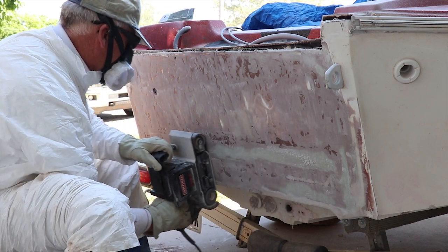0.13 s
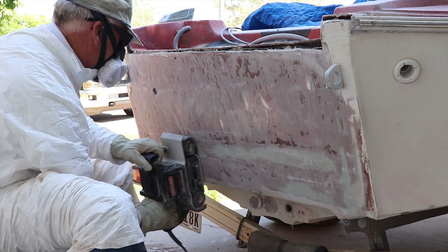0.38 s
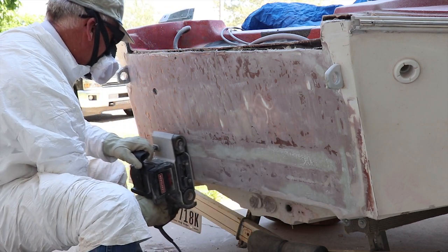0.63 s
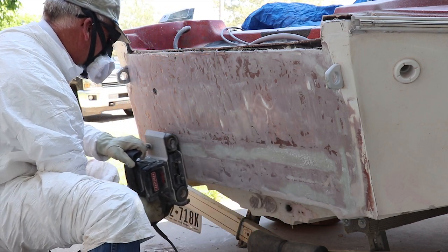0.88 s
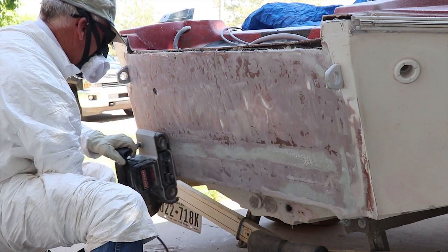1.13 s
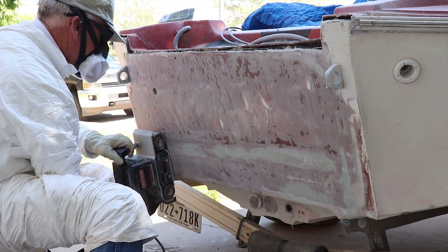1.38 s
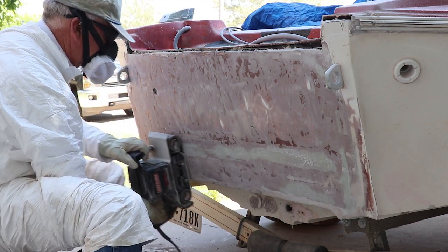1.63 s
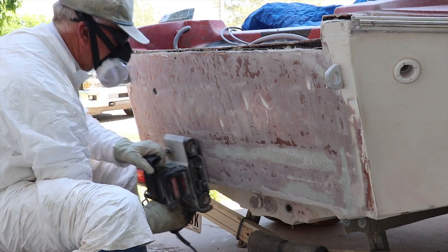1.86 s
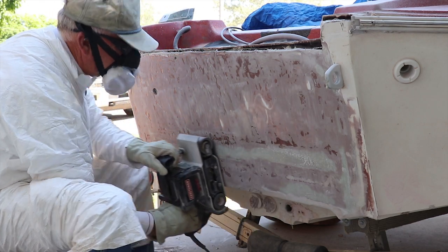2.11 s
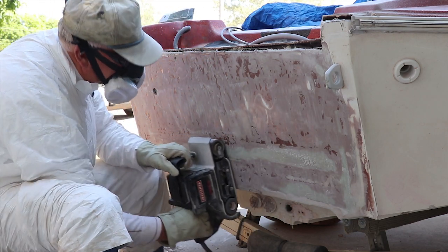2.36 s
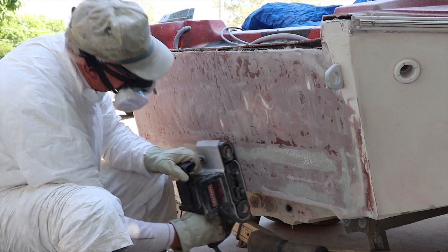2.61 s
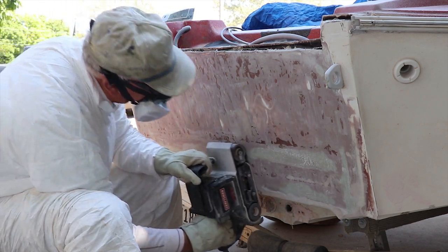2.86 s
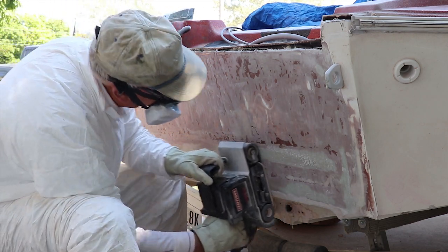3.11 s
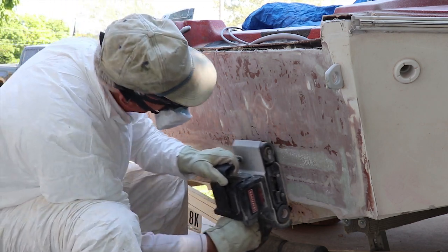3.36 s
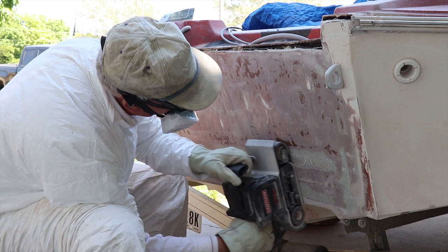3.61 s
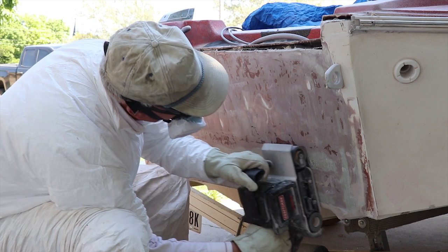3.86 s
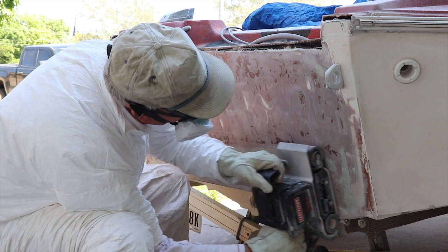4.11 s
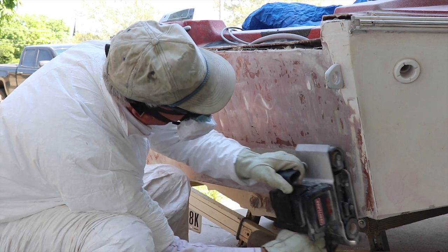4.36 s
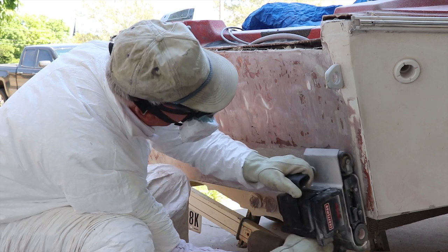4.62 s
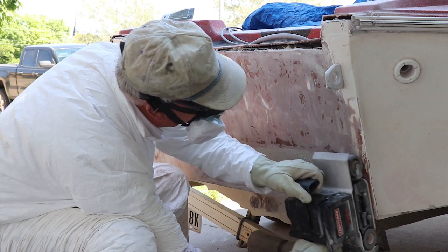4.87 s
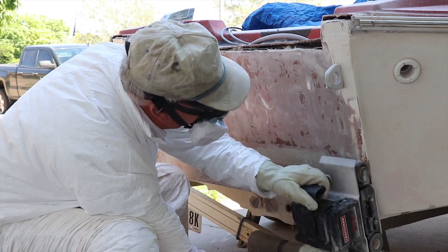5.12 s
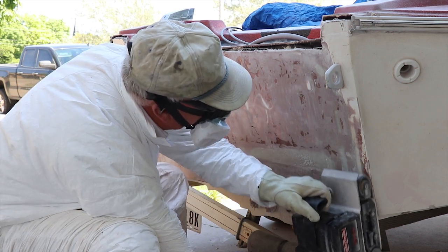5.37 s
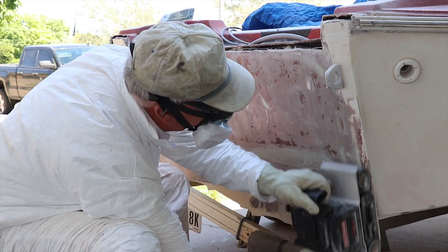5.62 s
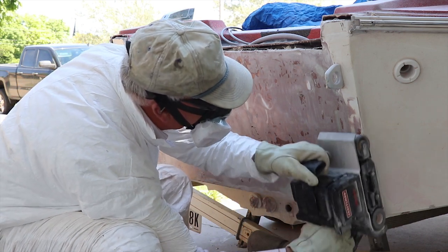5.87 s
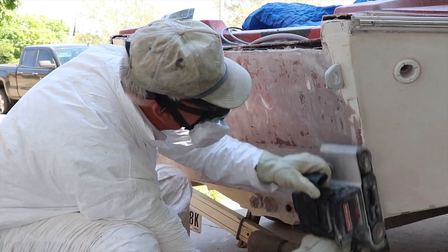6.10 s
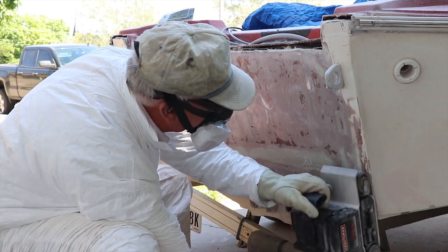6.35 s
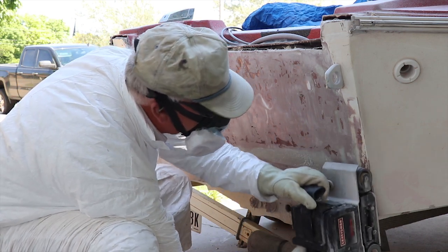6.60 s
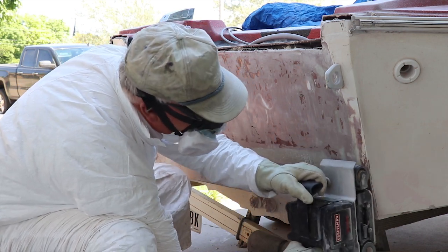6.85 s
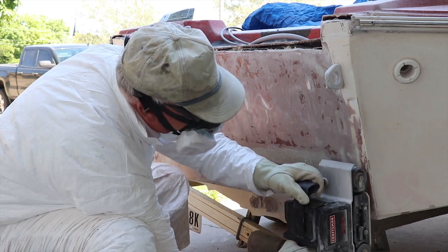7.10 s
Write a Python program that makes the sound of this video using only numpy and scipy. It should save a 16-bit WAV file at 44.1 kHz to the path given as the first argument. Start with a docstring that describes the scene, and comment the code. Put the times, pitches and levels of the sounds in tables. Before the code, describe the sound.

A handheld belt sander whines high and steady while its abrasive rasps on a hollow hull, briefly let go, pulled again, then running down.

```python
"""Outdoors under a roof, a handheld belt sander grinds a fibreglass hull a step from two microphones.
Sines locked to the shaft angle give the whine of drive belt, fan, commutator and weaker orders.
Shaped noise gives hull drone, air rush and abrasive rasp, over soft hull thuds and a low yard rumble.
The trigger is let go briefly, pulled again, then released so that the motor runs down."""
import sys
import numpy as np
from scipy import signal
from scipy.fft import rfft, irfft
from scipy.io import wavfile
from scipy.ndimage import uniform_filter1d

SR = 44100
rng = np.random.default_rng(int(sys.argv[2]) if len(sys.argv) > 2 else 0)


def generate_wav(signal):
    """Clip the signal to [-1, 1] and save it as 16-bit WAV at the path in sys.argv[1]."""
    frames = np.transpose(np.atleast_2d(signal))
    scaled = np.clip(frames, -1, 1) * 32767
    pcm = np.round(scaled).astype(np.int16)
    wavfile.write(sys.argv[1], SR, pcm)


def voltage_ratio(decibels):
    """Convert decibels (scalar or array-like) to amplitude ratios, 20 dB per decade."""
    exponent = np.asarray(decibels, float) / 20
    return 10 ** exponent


N = 318843

# Yard rumble, relative spectrum: f/Hz, level/dB
YARD_SPECTRUM = [(12, -40), (25, -24), (40, -14), (60, -10), (80, -7.5), (100, -5), (135, -9), (200, -7.5),
                 (255, -12.5), (280, -2), (300, 0.5), (390, -27)]
# Knocks of the tool on the hull: t/s, level/dB (the envelope peaks 2.6 dB higher), f/Hz
HULL_KNOCKS = [(0.479, -42, 103), (1.46, -32, 522), (2.292, -43, 96.9), (2.832, -39, 159),
               (4.005, -31, 867)]
# Relative noise spectra of hull drone, air rush and abrasive rasp: f/Hz, level/dB per Hz
DRONE_SPECTRUM = [(150, -54), (250, -26), (295, -23.5), (329, -11.5), (366, -6.5), (471, -9), (737, -2.5),
                  (815, -4.5), (949, -4.5), (1050, -10.5), (1400, -6), (1820, -14.5), (3080, -120)]
RUSH_SPECTRUM = [(590, -32), (1000, -33), (1040, -14), (1250, -7.5), (1470, -8), (1550, -9.5),
                 (1590, -10.5), (1720, -12), (1900, -8), (2680, -9.5), (3020, -5.5), (3560, -10),
                 (4410, -12), (4870, -33), (5500, -16.5), (7150, -24), (12100, -120)]
RASP_SPECTRUM = [(2650, -20), (4500, -10.5), (5100, -11.5), (6000, -6), (7100, -3.5), (7900, -4.5),
                 (9000, -5.5), (10200, -8), (12000, -13), (15200, -18.5), (16000, -21)]
# Drone, rush, rasp in turn: level/dB, share of the push, change once turned away/dB,
# speed slope/dB per octave, left minus right/dB, change of that/dB per sample of lag
NOISE_LAYERS = [(-28.5, 0.89, -1.5, 2.5, 0.4, 0.17), (-26., 1.1, 0.05, 1.5, 0, 0.043),
                (-22.5, .8, -1.24, 6., 2.5, -1.5)]
# Slope of the noise about 7.5 kHz in stages 0-3: slope/dB per octave
TREBLE_SLOPE = [-1, -0.055, -1.4, -1.9]
# Hand on the tool: t/s, push/dB (before each layer's share), grit brightness above 9 kHz/dB per octave
HAND_PUSH = [(0, 1, -2), (.5, 0.1, 5), (1.1, -.5, 2), (1.5, 0, -.5), (1.9, -0.5, -2), (2.45, 0, 3),
             (3.14, -0.5, 8), (3.22, -0.5, 0), (3.56, 1, -1.), (4.55, 0.2, 1.5), (5.1, 0.5, 1),
             (5.22, -0.5, -1), (5.9, 0., 2), (6.7, 1.5, -3), (6.82, -0.5, 1), (7.23, -1.5, 5)]
# Coherence of the noise: f/Hz, share of the power that both microphones get alike
COHERENCE = [(100, 0.61), (400, 0.93), (800, 0.63), (1500, 0.26), (3500, 0.69), (5000, 0.72), (7000, 0.53),
             (15000, 0.48)]
# Stereo balance before any scaling: f/Hz, left minus right/dB
BALANCE = [(60, 3), (110, 2), (200, -13), (380, 1.5), (700, -1), (1290, 1.5), (2380, -4), (4400, -1.0),
           (8120, -2.5), (15000, -4.5)]
# Path difference as the tool works toward the right: t/s, lag of the left microphone/samples
LEFT_LAG = [(0, 0), (2.5, 0.3), (3.3, 1), (4.2, 2), (7.23, 3)]
# Stage of the work: t/s, stage (0 facing the microphones, 1 turned away, 2 new pull, 3 running down)
WORK_STAGE = [(0, 0), (2.9, 0), (3.5, 1), (5.45, 1), (5.75, 2), (6.4, 2), (6.55, 3), (7.23, 3)]
# Housing resonances before any scaling: f/Hz, width/Hz, level/dB
HOUSING_MODES = [(480, 50, -8), (570, 70, 6), (690, 70, -10), (840, 60, 9), (960, 60, -5), (1150, 90, 7),
                 (1900, 150, 4), (2370, 110, 11), (2780, 120, 6), (5750, 300, 4), (6600, 400, 6),
                 (8550, 350, 6)]
# Shaft speed while the belt bites, slower under a firmer push: t/s, speed/turns per s
LOADED_SPEED = [(0.0, 364.5), (0.14, 360.8), (0.3, 364.6), (0.52, 371.8), (0.92, 377.4), (1.08, 374.4),
                (1.35, 377.0), (1.76, 380.6), (1.98, 373.2), (2.22, 370.8), (2.66, 377.2), (3.18, 375.6),
                (3.45, 367.4), (3.76, 363.4), (3.92, 366.0), (4.24, 360.3), (4.5, 364.2), (4.72, 373.0),
                (4.97, 376.6), (5.12, 371.0), (5.3, 365.0), (5.45, 367.5)]
# Brief dips of the mesh tone: t/s, length/s
MESH_DIPS = [(0.253, 0.021), (3.538, 0.0047), (3.643, .008), (4.01, 0.01), (4.207, 0.0064)]
# Beaming of the mesh tone by the belt cover as the tool turns:
# t/s, left minus right/dB, level toward the microphones/dB
COVER_BEAM = [(0, 2, 0), (.85, 1.5, 2), (1.05, 2, -1), (1.38, 11, -1), (1.7, 1, 3), (2.0, 0, -3),
              (2.7, 5, -1.5), (3.15, -5, -1), (3.6, -6, 1.5), (4.35, -16, -0.5), (4.9, -2, 1),
              (5.4, -3, 0.5), (5.8, -3, -1), (6.15, -5, 2), (6.33, -14, -3), (6.55, -3, 6.5), (7.23, 2, 3)]
# Swells of the mesh octave, before housing and trim: t/s, half length/s, level/dB
MESH_OCTAVE_SWELLS = [(.1, .15, -33), (2.05, 0.17, -30.5), (2.75, 0.29, -30.5), (3.25, 0.22, -32.5),
                      (3.6, .12, -29.5), (4.15, 0.15, -30.5), (5.05, 0.23, -30), (5.9, 0.14, -27),
                      (6.69, 0.061, -32.5)]
# Commutator whistle where its echoes add up, before the speed slope:
# t/s, half length/s, level/dB, left minus right/dB, lead of the left/rad
COMMUTATOR_SWELLS = [(.1, .12, -32, -4, -1.5), (.48, 0.15, -23.5, 7, -2.5), (.88, 0.12, -25.5, 16, -6),
                     (1.18, .08, -43, 11, 2.5), (1.36, 0.15, -24, -10, -1), (1.72, 0.17, -23, 8, -3),
                     (2.1, .12, -28.5, -14, -0.5), (2.4, 0.14, -25, 6, -5), (2.8, .15, -35, 2, -5),
                     (3.12, .15, -24, -7, -5), (3.6, .15, -38, -1, -8), (3.92, .1, -29, 2, -8.7),
                     (4.2, .1, -28, 4, -10), (4.65, 0.1, -26, 3, -8), (4.82, .08, -40, -20, -12),
                     (5.12, 0.075, -25, -4, -7.5), (5.38, .08, -30, -4, -5.5), (5.85, 0.11, -23.5, -4, 2),
                     (6.1, .1, -41, -4, 1.5), (6.7, .2, -31, 1, 1.5)]
# Fan tone in stages 0-3, before load and coasting: level/dB
FAN_STAGE_DB = [-32, -32.5, -31.5, -40]
# Hum of the belt pulley through the hull: t/s, level/dB
PULLEY_HUM = [(0, -77), (3.6, -73), (3.94, -58), (4.2, -64), (4.39, -55), (5.1, -58), (5.5, -68),
              (5.7, -78), (7.23, -79)]
# Weaker tones, before housing: multiple of the shaft rate, then level/dB in stages 0-3; thirds are the
# belt pulley, many close to 4 are mesh sidebands from pulley and belt laps, others perhaps bearings
WEAK_ORDERS = [(0.992, -41, -44, -47, -46), (1.966, -39.5, -40, -48, -50),
               (2.575, -35.5, -40.5, -42.5, -41), (3.025, -84, -52, -51, -53), (3.55, -45, -43, -36.5, -46),
               (3.69, -77, -39.5, -45, -67), (3.916, -56, -39.5, -34.5, -51), (4.06, -49, -49, -38, -41.5),
               (4.383, -48.5, -42, -36, -56), (4.954, -45, -82, -43, -54), (5.13, -45.5, -63, -60, -41.5),
               (5.925, -44.5, -64, -57, -56), (6.34, -57, -53, -62, -62), (7.13, -58, -52, -48, -51),
               (7.91, -63, -60, -44.5, -53), (9.04, -43.5, -44, -45, -46), (10.1, -47, -53, -43, -52),
               (11.03, -45.5, -45, -57, -60), (12.05, -44, -52, -47, -41), (13.84, -46, -64, -59, -69),
               (16.53, -67, -52, -44.5, -43), (38, -58, -61, -72, -65)]

MESH, BLADES, BARS = 4, 19, 25  # events per shaft turn
PULLEY_TURNS, SEAM_LAPS = 1 / 3, 0.098  # per shaft turn
RELEASE_S, PULL_S, STOP_S = 5.47, 5.73, 6.425  # trigger let go, pulled again, let go for good
FREE_TURNS, LOAD_SPAN = 385, 18.3  # speed without load, drop at full load (turns per s)
WIN = 1024  # noise frame (samples)


def over_time(table):
    """Linear interpolation: the columns of a table at every sample."""
    s, *columns = np.transpose(table)
    return [np.interp(np.arange(N) / SR, s, c) for c in columns]


def over_hz(table, hz, outside=None):
    """Logarithmic frequency axis: a spectrum table read at hz."""
    f, v = np.transpose(table)
    return np.interp(np.log(np.maximum(hz, 1)), np.log(np.maximum(f, 1)), v, outside, outside)


def by_stage(values, stage):
    """Linear interpolation between the values for stages 0-3."""
    return np.interp(stage, np.arange(4), values)


def walk(rate, count=1):
    """Random modulation: levels held about 1 / rate s and slewed twice; spread near 1."""
    k = int(SR / rate / 64) + 1  # in steps of 64 samples
    held = np.repeat(rng.standard_normal((count, N // (64 * k) + 2)), k, axis=1)
    coarse = 1.146 * uniform_filter1d(uniform_filter1d(held, k), k)
    return np.array([np.interp(np.arange(N) / 64, np.arange(len(c)), c) for c in coarse])


def sides(pan_db):
    """Constant-power panning: left and right gains."""
    gain = voltage_ratio(np.array([pan_db, -pan_db]) / 2)
    return gain * np.sqrt(2 / np.sum(gain ** 2, axis=0))


def housing_db(hz):
    """Resonance: lift or dip of the housing at a frequency, as a sum of bell curves."""
    return sum(db / (1 + (2 * (hz - f) / width) ** 2) for f, width, db in HOUSING_MODES)


def swells(table, steady_db):
    """Power addition: a steady level plus bell-shaped swells."""
    t = np.arange(N) / SR
    power = voltage_ratio(steady_db) ** 2
    for s, half, db, *_ in table:
        power = power + voltage_ratio(db) ** 2 * np.exp(-((t - s) / half) ** 2)
    return 10 * np.log10(power)


def yard():
    """Diffuse background: low rumble of the surroundings and the trailer, nearly alike in both channels."""
    hz = np.fft.rfftfreq(N, 1 / SR)
    spectrum = rfft(rng.standard_normal((2, N))) * voltage_ratio(over_hz(YARD_SPECTRUM, hz, -99))
    mid, side = irfft(spectrum, N)
    both = mid + 0.19 * side * np.array([[1], [-1]])
    both = both * voltage_ratio(0.5 * walk(3.08)) * sides(1.6)[:, None]
    return voltage_ratio(-51.5) * both / mid.std()


def knocks():
    """Impact excitation: short soft thuds of the hull, each a sine that rises and decays."""
    out, t = np.zeros(N + SR), np.arange(SR // 4) / SR
    envelope = (t / 0.0089) * np.exp(1 - t / 0.012)
    for s, db, hz in HULL_KNOCKS:
        out[int(s * SR):][:len(t)] += voltage_ratio(db) * np.sin(2 * np.pi * hz * t) * envelope
    return out[:N]


def noise_power(hz, at, speed, lag):
    """Incoherent addition: drone, rush and rasp powers per channel, frequency and frame."""
    push_db, bright = (c[at] for c in over_time(HAND_PUSH))
    stage = over_time(WORK_STAGE)[0][at]
    away, octaves = np.minimum(stage, 1), np.log2(speed[at] / FREE_TURNS)
    power = 0
    for table, layer in zip((DRONE_SPECTRUM, RUSH_SPECTRUM, RASP_SPECTRUM), NOISE_LAYERS):
        db, share, away_db, speed_db, pan_db, lag_db = layer
        db = db + share * push_db + away_db * away + speed_db * octaves
        pan_db = pan_db + lag_db * lag[at]
        shape = voltage_ratio(over_hz(table, hz, -99) + 0.26 * housing_db(hz)) ** 2
        power = power + (shape / shape.mean())[:, None] * (voltage_ratio(db) * sides(pan_db))[:, None] ** 2
    # treble slope by stage, above 4.5 kHz and level below 5.5 kHz
    slope_octaves = np.log2(np.maximum(hz, 5500) / 7500)[:, None] * (hz > 4500)[:, None]
    power = power * voltage_ratio(by_stage(TREBLE_SLOPE, stage) * slope_octaves) ** 2
    power = power * voltage_ratio(bright * np.log2(np.maximum(hz, 9000) / 9000)[:, None]) ** 2
    # a shared random surge of the noise, growing from 1.2 kHz up
    surge_octaves = np.clip(np.log2(np.maximum(hz, 1) / 1200), 0, 1.5)[:, None]
    return power * voltage_ratio(0.45 * walk(22)[0][at] * surge_octaves) ** 2


def noises(speed, turns, lag):
    """Turbulence and abrasion: one noise, part direct and part scattered, coloured frame by frame."""
    # the load pulses once per pulley turn and once per lap of the belt seam
    pulley_db = 0.5 * np.sin(2 * np.pi * turns * PULLEY_TURNS)
    seam_db = 0.57 * np.sin(2 * np.pi * SEAM_LAPS * turns)
    beat = voltage_ratio(pulley_db + seam_db + .5 * walk(9)[0])
    white = beat * rng.standard_normal((3, N))
    hz, s, z = signal.stft(white, SR, nperseg=WIN, noverlap=WIN * 3 // 4)
    at = np.minimum((s * SR).astype(int), N - 1)
    power = noise_power(hz, at, speed, lag)
    # each third of an octave flickers a little on its own
    band = np.clip(3 * np.log2(np.maximum(hz, 1) / 200), 0, 19).astype(int)
    flicker = voltage_ratio(0.66 * walk(9, count=20)[:, at] + 0.28 * walk(2.5, count=20)[:, at])[band]
    alike = np.clip(over_hz(COHERENCE, hz), 0, 1)[:, None]
    delay = np.exp(-2j * np.pi * hz[:, None] * lag[at] / SR)
    direct = np.array([z[0] * delay, z[0]])
    scattered = z[1:]
    tilt = sides(0.79 * over_hz(BALANCE, hz))[:, :, None]
    mix = np.sqrt(alike) * direct + np.sqrt(1 - alike) * scattered
    mix = mix * np.sqrt(power) * flicker * tilt
    return signal.istft(mix, SR, nperseg=WIN, noverlap=WIN * 3 // 4)[1][:, :N]


def shaft():
    """Rotor dynamics: turns per s and drive 0-1 through load, coasting, a new pull and the run-down."""
    friction, drag_s = 78., 1.73  # steady loss (turns per s, each second), time constant of the drag
    pull_turns, pull_rise_s = 366.5, .29  # speed the new pull heads for, its time constant
    inertia_s, torque_s = .1, .06  # the rotor smooths load changes; the belt tightens and slackens
    t = np.arange(N) / SR

    def coast(start, s):
        return (start + friction * drag_s) * np.exp(-s / drag_s) - friction * drag_s

    def pull(start, s):
        return pull_turns + (start - pull_turns) * np.exp(-s / pull_rise_s)

    loaded = uniform_filter1d(over_time(LOADED_SPEED)[0], int(inertia_s * SR), mode="nearest")
    last = LOADED_SPEED[-1][1]
    low = coast(last, PULL_S - RELEASE_S)
    high = pull(low, STOP_S - PULL_S)
    speed = np.select([t < RELEASE_S, t < PULL_S, t < STOP_S],
                      [loaded, coast(last, t - RELEASE_S), pull(low, t - PULL_S)],
                      coast(high, t - STOP_S))
    on = (t < RELEASE_S) | (t > PULL_S) & (t < STOP_S)
    drive = uniform_filter1d(1. * on, int(torque_s * SR))
    return uniform_filter1d(speed, size=1024, mode="nearest"), drive


def tone(turns, multiple, db, pan_db, lead, wander_db, slip):
    """Interference: echoes off hull and body make a shaft multiple fade and slip apart in the two channels."""
    both, fade, drift, shake = walk(16), walk(5.6, count=2), walk(2.934)[0], walk(60)[0]
    angle = 2 * np.pi * (multiple * turns + rng.random())
    # the shaft shudders a little, which widens the higher tones most
    angle = angle + 0.048 * multiple * shake
    angle = angle + (lead / 2 + slip * drift) * np.array([[1], [-1]])
    level = np.sqrt(2) * voltage_ratio(db + wander_db * (both + .5 * fade))
    return level * sides(pan_db) * np.sin(angle)


def weak_orders(speed, turns, late, glide):
    """Order excitation: weaker tones swell as the motor carries them through a resonance."""
    stage = over_time(WORK_STAGE)[0]
    out = 0
    for k, *stage_db in WEAK_ORDERS:
        hz = k * speed
        low_cut_db = -18 * np.clip((300 - hz) / 30, 0, 1)  # steep cut under about 300 Hz
        db = by_stage(stage_db, stage) + housing_db(hz) + low_cut_db
        db = db + glide * (2.5 * walk(40)[0] - 1)
        out = out + tone(turns, k, db, over_hz(BALANCE, hz), k * late, wander_db=3.0, slip=min(0.079 * k, 1))
    return out


def pulley(turns, late):
    """Structure-borne sound: the belt pulley hums through the hull at its turning rate."""
    k = PULLEY_TURNS
    return tone(turns, k, over_time(PULLEY_HUM)[0], 2.5 + 0 * turns, k * late, wander_db=4.5, slip=.1)


def fan(turns, late, load, drive):
    """Blade passing: a tone at the blade rate, weaker under load and when coasting."""
    db = by_stage(FAN_STAGE_DB, over_time(WORK_STAGE)[0]) - 1.5 * load - 6. * (1 - drive)
    return tone(turns, BLADES, db, 0 * turns, BLADES * late, wander_db=-0.5, slip=1.0)


def commutator(turns, octaves, glide):
    """Bar passing: a whistle at the commutator bar rate, with fast random roughness."""
    db = swells(COMMUTATOR_SWELLS, -32) + 8. * octaves
    pan_db, lead = over_time(COMMUTATOR_SWELLS)[2:]
    roughness = voltage_ratio(glide * (5 * walk(50, count=2) - 3)) * (1 + .25 * walk(600)[0])
    return roughness * tone(turns, BARS, db, pan_db, lead, wander_db=.7, slip=.08)


def mesh_modulation(turns):
    """Amplitude modulation: the mesh dips, at random and at set moments, and pulses as the belt seam comes round."""
    t = np.arange(N) / SR
    gain = 1 - 0.89 * np.clip(walk(40)[0] - .9, 0, 1)
    gain = gain * (1 - sum(np.exp(-((t - s) / length) ** 2) for s, length in MESH_DIPS))
    return gain * (1 + .25 * np.sin(2 * np.pi * SEAM_LAPS * turns + 1.5 * walk(6)[0]))


def drive_belt(speed, turns, late, load, octaves, drive, glide):
    """Tooth meshing: the mesh tone, its octave, and sidebands of the octave from an eccentric pulley."""
    modulation, flutter = mesh_modulation(turns), 1 + .33 * walk(70)[0]
    pan_db, aim_db = over_time(COVER_BEAM)
    slack_db = -5.5 + 19 * octaves + 1.4 * housing_db(MESH * speed)  # change when coasting
    mesh_db = -32. + 4.5 * load + aim_db + (1 - drive) * slack_db
    sweep = voltage_ratio(glide * (3.0 * walk(45, count=2) - 1.5))
    out = modulation * sweep * tone(turns, MESH, mesh_db, pan_db, MESH * late, wander_db=1.5, slip=0.4)

    k = 2 * MESH
    octave_db, octave_pan = swells(MESH_OCTAVE_SWELLS, -39.5), -2.5 + 0 * turns
    resonant_db = octave_db + 0.73 * housing_db(k * speed) - 3.5
    octave = tone(turns, k, resonant_db, octave_pan, k * late, wander_db=1.0, slip=0.18)
    out += modulation * flutter * octave
    # about one pulley turn either side of the octave
    for side, share_db in ((0.95, -7.5), (-1, -24.0)):
        k = 2 * MESH + side * PULLEY_TURNS
        out += flutter * tone(turns, k, octave_db + share_db, octave_pan, k * late, wander_db=2.5, slip=0.68)
    return out


def motor(speed, turns, lag, drive):
    """Superposition: the whine is the sum of tones locked to the shaft angle."""
    late = -2 * np.pi * lag * speed / SR  # phase of the left channel at the shaft rate (rad)
    load = np.clip((FREE_TURNS - speed) / LOAD_SPAN, 0, 1)
    octaves = np.log2(speed / FREE_TURNS)
    # a gliding whine sweeps through the echo pattern and flickers: full at 120 turns per s each second
    glide = np.clip(np.abs(np.gradient(speed)) * SR / 120, 0, 1)
    out = weak_orders(speed, turns, late, glide) + pulley(turns, late)
    out += fan(turns, late, load, drive) + commutator(turns, octaves, glide)
    return out + drive_belt(speed, turns, late, load, octaves, drive, glide)


def scene():
    """Superposition: yard, hull and sander as the two microphones get them."""
    speed, drive = shaft()
    turns, lag = np.cumsum(speed) / SR, over_time(LEFT_LAG)[0]
    return yard() + knocks() + noises(speed, turns, lag) + motor(speed, turns, lag, drive)


def band_limit(x):
    """A steep low-pass at the top of the band."""
    return signal.sosfilt(signal.butter(12, 16660, fs=SR, output="sos"), x)


def record(dry):
    """Band limiting: a steep elliptic low-pass removes the top above 15.73 kHz."""
    lowpass = signal.ellip(10, .2, 70, 15730, fs=SR, output="sos")
    mix = signal.sosfilt(lowpass, dry)
    return band_limit(mix)


dry = scene()
out = record(dry)
generate_wav(out)
```